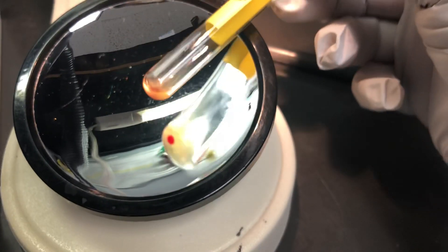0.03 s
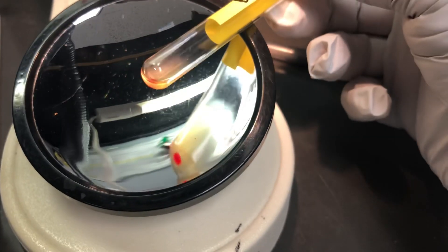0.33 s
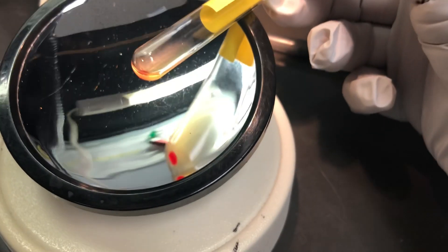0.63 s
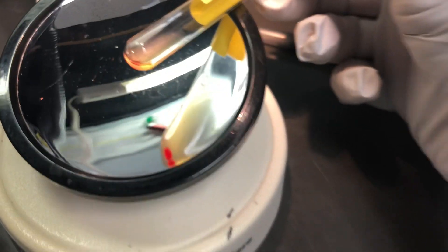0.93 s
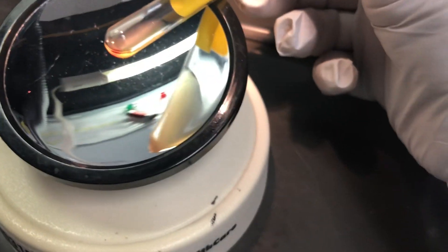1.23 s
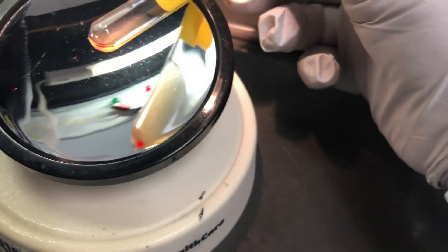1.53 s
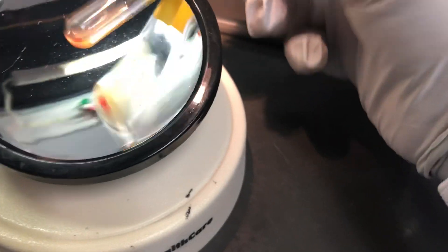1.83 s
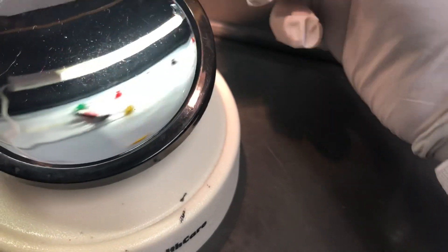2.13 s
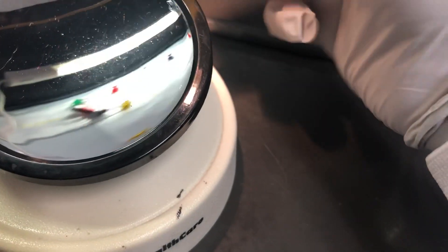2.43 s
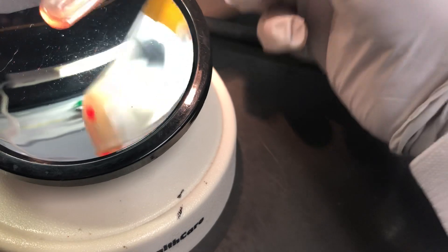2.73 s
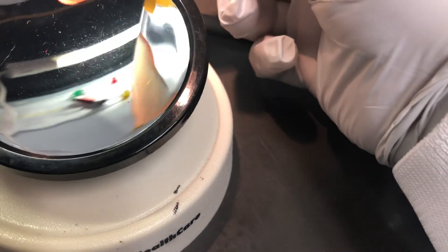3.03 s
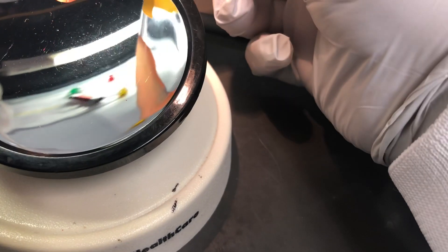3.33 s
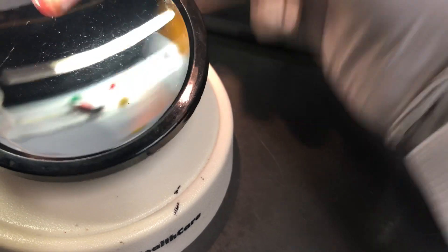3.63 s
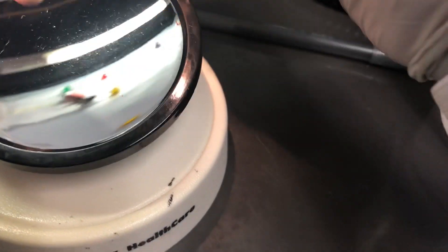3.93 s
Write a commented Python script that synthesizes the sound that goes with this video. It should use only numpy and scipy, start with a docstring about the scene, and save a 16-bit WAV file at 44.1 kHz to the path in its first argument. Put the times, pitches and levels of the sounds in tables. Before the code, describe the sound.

Glass test tubes clink lightly close by at about 0.2 seconds. At 3 seconds comes a second soft clink, with a dull bump and a faint glove rustle. Near 3.9 seconds the tubes chatter, strike very hard with a short bright ring, and rebound. Throughout, lab equipment hums quietly under rushing air, with a fan whine that throbs about three times a second.

```python
"""Test tubes clinking in a humming lab

Mains hum and a motor beat against each other, and fans whine over rushing air.
Glass test tubes in a gloved hand clink twice, then chatter, strike very hard and rebound.
Each touch is a short crack that sets the glass ringing; the glove rustles faintly.
The hard clink makes a limiter turn everything down for a moment, the hum included."""
import sys
import numpy as np
from scipy import signal
from scipy.fft import rfft, irfft
from scipy.io import wavfile
from scipy.ndimage import uniform_filter1d, minimum_filter1d

SR = 44100
rng = np.random.default_rng(int(sys.argv[2]) if len(sys.argv) > 2 else 0)


def master_out(mix):
    """Clip the mix to full scale and print it as 16-bit PCM to the path in sys.argv[1]."""
    frames = np.transpose(np.atleast_2d(mix))
    ceiling = np.clip(frames, -1, 1)
    pcm = np.round(ceiling * 32767).astype(np.int16)
    wavfile.write(sys.argv[1], SR, pcm)


N = 176400  # 4 seconds


def from_db(db):
    """Turn decibels into a number to multiply by."""
    return 10 ** (np.asarray(db) / 20)


def rms_one(x):
    """Scale a signal so that its average level (rms) is 1."""
    return x / np.sqrt(np.mean(np.abs(x) ** 2) + 1e-30)


def seconds():
    """The time of each sample."""
    return np.arange(N) / SR


def noise(gain_at):
    """Noise at level 1; gain_at says how strong each frequency is."""
    hz = np.maximum(np.arange(N // 2 + 1) * SR / N, 1)
    spectrum = rfft(rng.standard_normal(N)) * gain_at(hz)
    return rms_one(irfft(spectrum, N))


def shaped_noise(points):
    """Noise at level 1 whose tone follows a curve through (pitch_hz, relative_db) points."""
    pitch_hz, relative_db = np.transpose(points)
    return noise(lambda hz: from_db(np.interp(np.log(hz), np.log(pitch_hz), relative_db)))


def drift(rate_hz):
    """A random wander of about 1 either way, mostly slower than rate_hz."""
    return noise(lambda hz: 1 / (1 + (hz / rate_hz) ** 2))


def cut(x, hz, kind, order=2):
    """Keep the "low" or the "high" side of hz."""
    sections = signal.butter(order, min(hz, .45 * SR), kind, fs=SR, output="sos")
    return signal.sosfilt(sections, x + 1e-18)


def ring(t, hz, ring_s):
    """A struck tone that fades by 60 dB in ring_s seconds."""
    return np.sin(2 * np.pi * hz * t) * 1e-3 ** (t / ring_s)


def add(out, start_s, sound):
    """Mix a sound in at the given time."""
    i = int(start_s * SR)
    out[i:i + len(sound)] += sound[:N - i]


def test_tubes():
    """Glass hits glass: soft touches are duller and knock more, lingering ones damp the ring."""
    # each touch: start_s, ring_db, hardness (0-1), crack_db, knock_db, top_hz, ring_time_factor
    touches = [(0.2307, -15, 0.25, -45, -20.5, 10900, .95), (3.005, -20.5, 0.08, -39, -21.5, 12500, 0.9),
               (3.9211, -21.5, 0.8, -38, -54, 15200, 0.47), (3.933, -29, 0.7, -37, -56, 15000, 0.93),
               (3.9445, 13.5, 0.86, -8.5, -30, 16500, 0.83), (3.9628, -16, 1, -52, -60, 14000, 1.5)]
    # the tones of the glass: pitch_hz
    glass_pitches = [3552, 4500, 4615, 4877, 4888, 5100, 7070, 7810, 7845, 9500, 11085, 11850, 15000]
    # how each of those tones rings: soft_touch_db, hard_touch_db, ring_s
    glass_tones = [(3, -10, 0.025), (-38, -18, 0.027), (-11, -26, 0.043), (-16, -4.5, 0.018),
                   (-24.5, -19, 0.075), (-44, -26, 0.0044), (-24, -42, 0.024), (-33, -14, 0.009),
                   (-45, -24, 0.069), (-26, -40, 0.012), (-34, -32, 0.023), (-39, -24, 0.016),
                   (-56, -32, .022)]
    # the dull knock of the held tubes: pitch_hz, relative_db, ring_s
    knock_tones = [(876, -12.5, 0.0092), (1480, -11, 0.025), (2580, -11, 0.0078), (2960, -3.5, 0.01),
                   (3230, 1, 0.0097)]
    # the tone of the crack on contact: pitch_hz, relative_db
    crack_shape = [(2300, -31), (3200, 1), (5500, -8), (8500, -11), (11500, -11), (15500, -6)]
    contact_s, crack_fade_s = 0.0001, 0.01
    bench_echo_s, bench_echo_db = .00225, -11
    t, out = seconds()[:SR // 5], np.zeros(N)
    build_up = 1 - np.exp(-(t / contact_s) ** 2)
    knock = sum(from_db(db) * ring(t, hz, ring_s) for hz, db, ring_s in knock_tones)
    for start_s, ring_db, hardness, crack_db, knock_db, top_hz, ring_time_factor in touches:
        glass = np.zeros(len(t))
        for hz, (soft_db, hard_db, ring_s) in zip(glass_pitches, glass_tones):
            tone_db = soft_db + hardness * (hard_db - soft_db)
            glass += from_db(tone_db) * ring(t, hz, ring_time_factor * ring_s)
        crack = from_db(-60 * t / crack_fade_s) * shaped_noise(crack_shape)[:len(t)]
        clink = build_up * (from_db(ring_db) * glass + from_db(crack_db) * crack)
        clink = cut(clink, 3380, "high", order=6)  # keep the clink bright: cut its low tones steeply
        touch = cut(clink + from_db(knock_db) * build_up * knock, top_hz, "low", order=4)
        add(out, start_s, touch)
        add(out, start_s + bench_echo_s, from_db(bench_echo_db) * touch)  # echo off the bench top
    return out


def gloved_hand():
    """The hand bumps softly on the tubes, and the glove rustles as it rubs."""
    # soft bumps: start_s, level_db, pitch_hz, ring_s
    bumps = [(3.003, -28.5, 165, 0.051), (3.0038, -27.5, 637, 0.0092), (3.021, -30, 162, 0.098),
             (3.047, -28, 160, 0.066), (3.327, -36, 347, 0.12)]
    # rubs of the glove: start_s, length_s, level_db, top_hz
    rubs = [(1.4, 0.82, -70, 14000), (2.585, .024, -64, 15000), (2.978, 0.033, -50, 5800),
            (3.69, 0.16, -66.5, 19000)]
    # the tone of the rustle: pitch_hz, relative_db
    rustle_shape = [(2000, -1), (5500, 0), (10000, 1), (13000, -3), (15500, 1)]
    grain_db, fade_share = 3, 0.27
    t, out = seconds(), np.zeros(N)
    for start_s, db, hz, ring_s in bumps:
        bump = cut(ring(t[:SR // 2], hz, ring_s), 100, "high")  # the microphone thins the bass
        add(out, start_s, from_db(db) * bump)
    rustle = shaped_noise(rustle_shape) * from_db(grain_db * drift(rate_hz=87))
    for start_s, length_s, db, top_hz in rubs:
        from_edge_s = np.minimum(t - start_s, start_s + length_s - t)
        fade = np.clip(from_edge_s / (fade_share * length_s), 0, 1)
        out += from_db(db) * rms_one(cut(rustle, top_hz, "low")) * fade
    return out


def machines():
    """The main fan throbs about three times a second, mains and motors hum, and fan whines waver."""
    # steady tones of mains and motors: pitch_hz, level_db
    hums = [(120.0, -50.5), (129.84, -45), (280.5, -55.5), (649.2, -60.5)]
    # wavering tones, fan whines and a motor overtone (389.5 Hz): pitch_hz, level_db, waver_depth
    whines = [(245.5, -58, .5), (389.5, -62, .5), (705.2, -63, .3), (807.5, -66, .3), (1105.5, -59, .15),
              (1195, -65, .5), (1207.5, -60, .3), (1341, -68, .3), (1382.5, -66.5, .3), (1515, -74, .4),
              (1674, -71.5, .3), (1786, -62.3, .25), (2012.5, -67, .15), (2385, -76, .3), (2975, -79, .3),
              (5195, -85, .3), (12250, -86, .4)]
    fan_hz, fan_db, fade_db_per_s = 595.7, -43.5, -0.7
    swell_every_s, swell_peak_s, swell_db = .337, .37, 3.9
    t = seconds()
    swell = np.cos(np.pi * (t - swell_peak_s) / swell_every_s) ** 6
    level_db = fan_db + fade_db_per_s * (t - t.mean()) + swell_db * (swell - swell.mean())
    out = from_db(level_db) * np.sin(2 * np.pi * fan_hz * t)
    for hz, db in hums:
        out += from_db(db) * np.sin(2 * np.pi * (hz * t + rng.random()))
    for hz, db, depth in whines:
        # a complex number lets both the level and the phase waver
        waver = rms_one(1 + depth * (drift(rate_hz=2.9) + 1j * drift(rate_hz=2.9)))
        tone = np.exp(2j * np.pi * (hz * t + rng.random()))
        out += from_db(db) * np.real(waver * tone)
    return np.sqrt(2) * out  # a sine peaks at sqrt(2) times its average level


def ventilation():
    """Air rushes broadly and stirs the equipment housings into narrow bands of noise."""
    # the tone of the rushing air: pitch_hz, relative_db
    air_shape = [(12, -55), (35, -27), (50, -12), (70, -8), (110, -4.5), (260, -5.5), (450, -12.5),
                 (750, -12), (1000, -18), (1280, -22.5), (1550, -20.5), (2100, -26.5), (4000, -32),
                 (7000, -39), (10300, -48.5), (13000, -47), (16000, -54.5)]
    # where the housings resonate: pitch_hz, width_hz, level_db
    housings = [(166, 30, -58), (263, 24, -60), (341, 24, -50.5), (599, 32, -56.5), (664, 14, -60.5),
                (1056, 37, -67), (1185, 73, -62), (11880, 750, -74), (12280, 200, -79.5)]
    out = from_db(-44) * shaped_noise(air_shape)
    for hz, width_hz, db in housings:
        out += from_db(db) * noise(lambda f: 1 / (1 + ((f - hz) / width_hz) ** 2) ** 2)
    return out


def room_echo(x):
    """The bench and walls scatter a sound into a short, bright tail."""
    level_db, fade_s, delay_s = -21.5, 0.12, 0.0019
    t = seconds()[:SR // 2]
    hiss = cut(rng.standard_normal(len(t)), 7460, "high", order=1)
    tail = hiss * from_db(-60 * t / fade_s) * (t > delay_s)
    tail /= np.sqrt(np.sum(tail ** 2))
    return from_db(level_db) * signal.fftconvolve(x, tail)[:N]


def scene():
    """Nearby glass and glove over the humming room, in one channel."""
    glass = test_tubes()
    return (machines() + ventilation() + gloved_hand() + glass + room_echo(glass))[None]


def record(dry):
    """A limiter turns the sound down briefly around a loud peak; then the highest treble is cut."""
    limit, treble_cut_hz = 0.92, 16000
    attack_s, hold_s, release_db_per_s = 0.00033, 0.013, 2602
    half_hold, ahead = int(hold_s * SR / 2), int(attack_s * SR)
    over_db = 20 * np.log10(np.maximum(np.abs(dry[0]) / limit, 1))
    held_db = -minimum_filter1d(-over_db, 2 * half_hold + 1, origin=half_hold)
    release_db = release_db_per_s * seconds()
    dip_db = np.maximum.accumulate(held_db + release_db) - release_db  # recover at a steady rate
    dip_db = -minimum_filter1d(-dip_db, 2 * ahead + 1)  # start just before the peak
    dip_db = uniform_filter1d(dip_db, ahead)
    treble_cut = signal.ellip(10, .1, 80, treble_cut_hz, fs=SR, output="sos")
    return signal.sosfilt(treble_cut, dry * from_db(-dip_db))


dry = scene()
out = record(dry)
master_out(out)
```